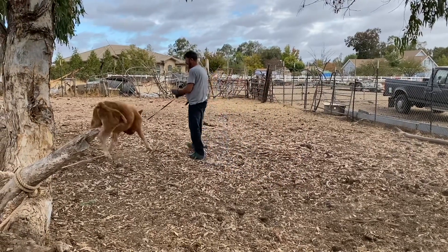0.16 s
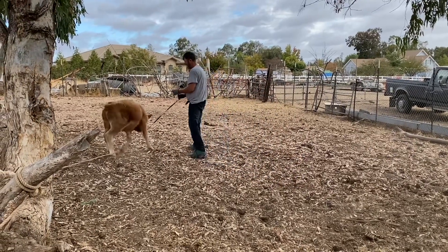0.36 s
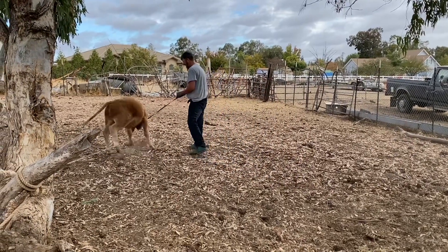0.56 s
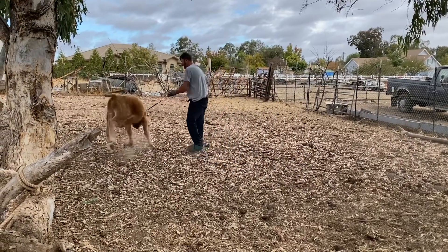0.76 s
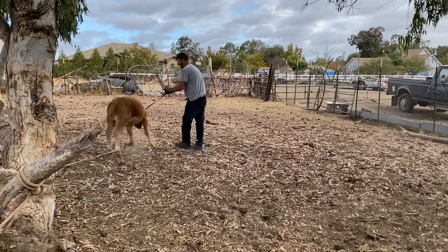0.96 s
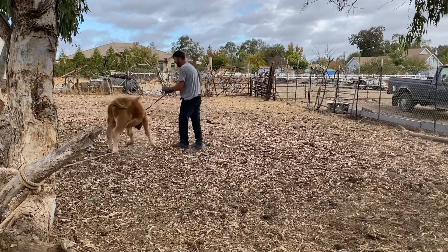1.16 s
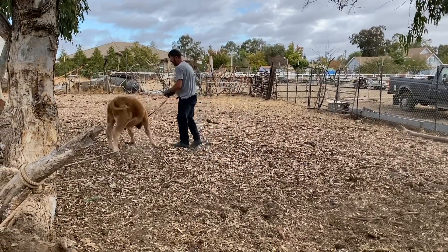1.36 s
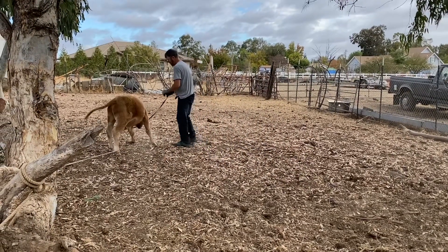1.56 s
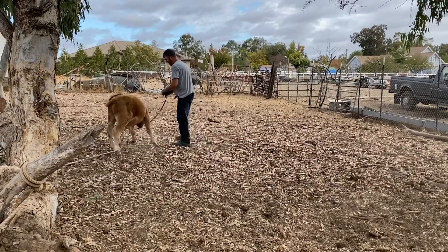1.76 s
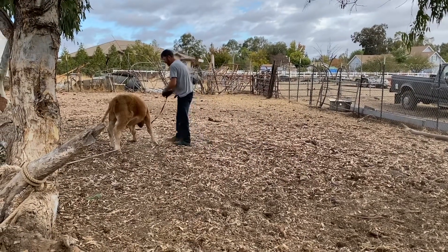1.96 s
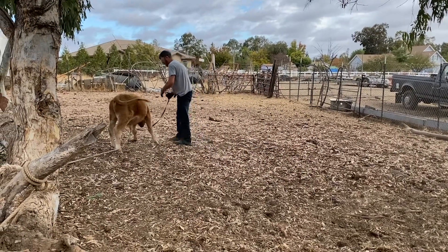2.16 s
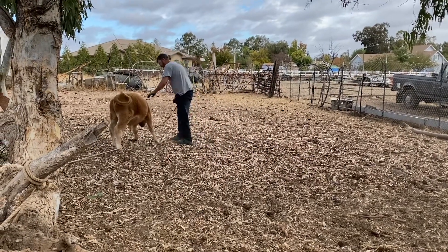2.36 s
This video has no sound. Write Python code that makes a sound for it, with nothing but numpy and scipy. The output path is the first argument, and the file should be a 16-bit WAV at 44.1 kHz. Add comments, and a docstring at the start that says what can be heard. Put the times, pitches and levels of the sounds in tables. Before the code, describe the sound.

Outdoors in a dirt pen, a hoof cracks dry chips, then a calf slightly left of centre bawls once, raspy then blaring and slowly falling, over brief litter scuffing and low rumble, with a faint scattered outdoor echo.

```python
"""A low outdoor rumble, then a hoof snaps dry wood chips and a calf on a rope bawls once in a dirt pen.
The voice starts as a rattle, climbs in strained steps, holds a clear note that slowly sinks, and drops
away as the mouth closes: pulses of the vocal folds ring a throat that glides between postures.
Hooves scuff the litter as grainy noise; fences and trees answer faintly as fading scattered noise."""
import sys
import numpy as np
from scipy import signal
from scipy.fft import rfft, irfft, next_fast_len
from scipy.io import wavfile
from scipy.ndimage import map_coordinates

SR = 44100
rng = np.random.default_rng(int(sys.argv[2]) if len(sys.argv) > 2 else 0)


def output_pcm(signal):
    """Save a mono or channel-first signal as 16-bit PCM at the path in sys.argv[1].

    Samples are clipped to [-1, 1] before scaling.
    """
    pcm = np.clip(np.atleast_2d(signal).T, -1, 1) * 32767
    wavfile.write(sys.argv[1], SR, np.round(pcm).astype(np.int16))


N = 105840  # 2.4 s


def amp(db):
    """Decibels to gain."""
    return 10 ** (np.asarray(db) / 20)


def unit(x):
    """Scaled to rms 1."""
    return x / np.sqrt(np.mean(x ** 2) + 1e-20)


def along(points, hz):
    """(Hz, value) points read on a log frequency axis."""
    point_hz, values = np.transpose(points)
    return np.interp(np.log(hz + 1), np.log(point_hz + 1), values)


def at(curve, t):
    """(s, value) points read at times t."""
    return np.interp(t, *np.transpose(curve))


def wobble(rate):
    """A smooth random curve, rate knots a second."""
    knots = rng.standard_normal(int(N * rate / SR) + 4)
    return map_coordinates(knots, [np.arange(N) * rate / SR])


def filtered(x, response):
    """x times a complex response of frequency."""
    padded = next_fast_len(N + SR // 2)
    hz = np.fft.rfftfreq(padded, 1 / SR)
    return irfft(rfft(x, padded) * response(hz), padded)[..., :N]


def noise(spectrum):
    """Two unrelated coloured noises of rms 1."""
    white = rng.standard_normal((2, N))
    return unit(filtered(white, lambda hz: amp(along(spectrum, hz))))


def air():
    """Outdoor rumble: coloured noise, nearly mono in the bass, widest near 400 Hz, gently swelling."""
    # background colour: freq_hz, level_db
    rumble = [(25, -29), (44, 0), (110, -3), (200, -9), (350, -22), (1500, -29), (3000, -39), (16000, -64)]
    # correlation of the two channels: freq_hz, likeness (0-1)
    likeness = [(100, 0.99), (400, 0.47), (1200, 1), (4000, 1)]
    level_db, swell_db = -48, 2

    def mid_and_side(hz):
        angle = np.arccos(np.clip(along(likeness, hz), -1, 1)) / 2
        return np.array([np.cos(angle), np.sin(angle)])

    mid, side = filtered(noise(rumble), mid_and_side)
    stereo = unit(np.array([mid + side, mid - side]))
    return stereo * amp(level_db + swell_db * wobble(7.2))


def snaps():
    """Dry chips crack under a hoof: bursts of bright noise with instant onset and exponential decay."""
    # cracks: start_s, level_db, t60_s
    cracks = [(.034, -35, .0067), (.039, -57, .071), (.094, -50, .035), (.355, -47, .025),
              (.998, -56, .098)]
    # colour of splitting wood: freq_hz, level_db
    wood = [(500, -24), (1500, -8), (4000, -17), (7000, -2), (16000, -15)]
    t = np.arange(N) / SR
    envelope = 0
    for start_s, level_db, t60_s in cracks:
        envelope = envelope + (t >= start_s) * amp(level_db - 60 * np.abs(t - start_s) / t60_s)
    return noise(wood)[0] * envelope


def causal(gain):
    """Rows of gains as minimum-phase spectra, which ring only after their excitation."""
    cepstrum = irfft(np.log(gain + 1e-9))
    half = cepstrum.shape[1] // 2
    cepstrum[:, 1:half] *= 2
    cepstrum[:, half + 1:] = 0
    return np.exp(rfft(cepstrum))


def bell(hz, centre_hz, width_hz):
    """Resonance curve, 1 at its centre and half at the edges of its width."""
    return 1 / (1 + (2 * (hz - centre_hz) / width_hz) ** 2)


def throat(times, hz):
    """Gain of throat and mouth at each time: resonances glide between postures, cavities cut hollows."""
    # resonances in each posture: centre_hz, width_hz (before the bell is sharpened), level_db
    rattle = [(318, 50, -24), (425, 56, -2.5), (1200, 530, -5), (1580, 113, -1), (2060, 330, -22),
              (3000, 500, -32)]
    strained = [(375, 80, -14), (488, 85, 0), (1200, 600, -9), (1640, 340, 0), (2230, 520, -17),
                (3000, 900, -39)]
    nasal = [(400, 130, -1), (545, 100, 0), (1300, 620, -7), (1720, 280, -7), (2330, 600, -17),
             (3600, 1100, -34)]
    parting = [(400, 130, -6), (550, 100, 2), (1130, 400, -8), (1650, 600, -10), (2270, 330, -9.5),
               (3300, 1500, -34)]
    wide_open = [(409, 170, -3.5), (529.7, 98, 4), (1152, 650, -4.5), (1628, 295, 0.5), (2242, 556, -6.5),
                 (3240, 1200, -33)]
    narrowed = [(429, 71, -8.5), (526, 165, 5), (1191, 253, -16), (1680, 500, -23), (2200, 720, -23),
                (3100, 500, -40)]
    closing = [(402, 89, -0.5), (534, 175, 6), (1182.8, 168, -8), (1435, 1500, -16.5), (2350, 464, -17),
               (3050, 800, -27)]
    # mouth movement: time_s, posture (0-6, in the order above; fractions blend neighbours)
    movement = [(.18, 0), (.245, 1), (.5, 1), (.63, 2), (.69, 2), (.79, 3), (.89, 4), (1.22, 4), (1.43, 5),
                (1.65, 5.1), (2.0, 6)]
    # faint top resonance: time_s, level_db
    sizzle = [(.3, -50), (1.2, -58.5), (1.8, -55), (2.2, -44)]
    # side cavities that swallow two bands: centre_hz, width_hz, depth_db
    cavities = [(860, 150, -5), (2870, 200, -5)]
    # sharp antiresonance that wanders as tongue and palate move: time_s, centre_hz, depth_db
    hollow = [(.6, 1560, 0), (.735, 1490, -18), (.78, 1400, -2), (1.08, 1290, 0), (1.17, 1260, -13),
              (1.26, 1240, -4), (1.38, 940, -9), (1.58, 915, -9), (1.7, 900, 0), (2.1, 860, -8),
              (2.2, 850, 0)]
    # lips shutting, with twice the cut from 2 kHz up: time_s, cut up to 1 kHz (dB)
    muffle = [(2.08, 0), (2.19, -12.5)]
    sizzle_hz, sizzle_width_hz = 6160, 1880
    hollow_width_hz = 110

    postures = np.array([rattle, strained, nasal, parting, wide_open, narrowed, closing])
    position = at(movement, times)
    weights = np.array([np.interp(position, np.arange(len(postures)), row) for row in np.eye(len(postures))])
    # blended to (column, resonance, time, 1)
    centre_hz, width_hz, level_db = np.einsum("pt,prc->crt", weights, postures)[..., None]
    power = (amp(level_db) ** 2 * bell(hz, centre_hz, width_hz) ** 2.62).sum(axis=0)
    sizzle_gain = amp(at(sizzle, times))[:, None] * bell(hz, sizzle_hz, sizzle_width_hz)
    power += sizzle_gain ** 2

    time_s, *columns = np.transpose(hollow)
    hollow_hz, depth_db = (np.interp(times, time_s, column)[:, None] for column in columns)
    cavities_db = sum(depth * bell(hz, centre, width) for centre, width, depth in cavities)
    hollow_db = depth_db * bell(hz, hollow_hz, hollow_width_hz)
    lips_db = at(muffle, times)[:, None] * np.clip(hz / 1000, 1, 2)
    return np.sqrt(power) * amp(cavities_db + hollow_db + lips_db)


def bawl(size=2048):
    """Every closing of the folds rings the throat; hoarseness scatters the pulses and adds rasp to each."""
    # vocal folds, before a slight random waver: time_s, pitch_hz
    pitch = [(.09, 91.16), (.2, 99.54), (.24, 105), (.26, 115.7), (.318, 115.5), (.342, 125.5), (.408, 127),
             (.44, 133.1), (.49, 127.4), (.53, 133.7), (.576, 130.3), (.62, 139.3), (.738, 135.4),
             (.764, 137.8), (.854, 137.4), (.906, 140.5), (.996, 142.5), (1.15, 140.6), (1.348, 137.2),
             (1.406, 133.5), (1.476, 133.9), (1.8, 128), (2.124, 123.4), (2.2, 114.1), (2.27, 90.2),
             (2.31, 83.6)]
    # hoarseness: time_s, roughness (0-1)
    roughness = [(.2, .88), (.26, .34), (.4, .2), (.58, .17), (.64, .07), (2.1, .05), (2.3, .4)]
    # chest tone, the lowest partials: time_s, level_db
    chest_level = [(.09, -50), (.14, -43), (.24, -45), (.45, -39.5), (.652, -39), (.799, -41), (2.24, -42),
                   (2.31, -55)]
    # lowest throat resonances, below the split: time_s, level_db
    low_level = [(.09, -50), (.14, -42), (.235, -42), (.262, -27), (.292, -25.5), (.325, -35), (.355, -27),
                 (.415, -30), (.45, -25.5), (.55, -26.5), (.81, -24), (.91, -26), (1.12, -24.5),
                 (1.4, -20.5), (1.59, -25.5), (2.0, -28.5), (2.222, -27), (2.25, -39), (2.3, -53)]
    # bright blare, above the split: time_s, level_db
    blare_level = [(.09, -60), (.143, -41), (.222, -37), (.256, -24.5), (.285, -28), (.347, -20.5),
                   (.41, -23.5), (.434, -18), (.462, -24), (.518, -24), (.553, -27.5), (.715, -29.5),
                   (.85, -23.5), (.981, -21), (1.349, -25.5), (1.56, -28), (1.671, -27), (2.198, -34),
                   (2.251, -52), (2.31, -66)]
    # the throat delays these bands and blunts each pulse: centre_hz, width_hz
    smears = [(490, 310), (1900, 1800)]
    chest_hz, split_hz = 297, 800
    jitter_s, shimmer_db = .0003, 4  # both scaled by roughness
    rasp_share, rasp_t60_s = 1.65, .018
    rasp_from_hz = 600  # the low partials stay clean
    rasp_doubles_hz = 3350  # above this the voice turns to hiss

    # one pulse for each full cycle of the folds
    t, hz = np.arange(N) / SR, np.fft.rfftfreq(size, 1 / SR)
    cycles = np.cumsum(at(pitch, t) * (1 + 0.0019 * wobble(29.74))) / SR
    times = np.interp(np.arange(1, int(cycles[-1])), cycles, t)
    times = times[(times > pitch[0][0]) & (times < pitch[-1][0])]
    chance = rng.standard_normal((len(times), size + 2))
    rough = at(roughness, times)
    times = times + jitter_s * rough * chance[:, 0]

    # each band is levelled by its power at the pulse rate
    gain = throat(times, hz)
    below_split = 1 / (1 + (hz / split_hz) ** 10)
    chest = (1 / (1 + (hz / chest_hz) ** 10) / (1 + (90 / (hz + 10)) ** 3))[None]
    bands = ((chest, chest_level), (gain * below_split, low_level), (gain * (1 - below_split), blare_level))
    shaped = 0
    for band, level in bands:
        power = np.mean(band ** 2, axis=1) * at(pitch, times) / SR
        shaped = shaped + band * (amp(at(level, times)) / np.sqrt(power))[:, None]

    # a decaying puff of noise joins each click, without raising its expected power
    puff = amp(-60 * t[:size] / rasp_t60_s)
    puff_spectrum = rfft(chance[:, 2:] * puff / np.linalg.norm(puff))
    rasp_colour = (1 + (hz / rasp_doubles_hz) ** 4) * hz ** 2 / (hz ** 2 + rasp_from_hz ** 2)
    rasp = rasp_share * rough[:, None] * rasp_colour
    source = (1 + rasp * puff_spectrum) / np.sqrt(1 + rasp ** 2)

    phase = sum(np.arctan2(hz * width, centre ** 2 - hz ** 2) for centre, width in smears)
    smear = np.exp(-2j * phase)
    start, fraction = np.divmod(times * SR, 1)
    subsample_shift = np.exp(-2j * np.pi * hz * fraction[:, None] / SR)
    pulses = irfft(causal(shaped) * smear * source * subsample_shift)
    pulses *= amp(shimmer_db * rough * chance[:, 1])[:, None]
    places = start.astype(int)[:, None] + np.arange(size)
    return np.bincount(places.ravel(), pulses.ravel(), N)[:N]


def scuff(grain_db=2, sway_db=.8):
    """Hooves plough the loose litter: hiss with fast random grain and a slower sway in level."""
    # drag of the hooves, before grain and sway: time_s, level_db
    drag = [(.2, -65), (.42, -59), (.46, -48), (.54, -47.5), (.63, -53), (1.2, -65), (2.24, -71),
            (2.4, -90)]
    # colour of the loose litter: freq_hz, level_db
    litter = [(500, -12.5), (2000, 8.5), (7000, -2.5), (11000, -0.5), (16000, -11.5)]
    level_db = at(drag, np.arange(N) / SR) + grain_db * wobble(500) + sway_db * wobble(25)
    return noise(litter) * amp(level_db)


def pen(x, t60, level):
    """Scattered answer of the surroundings: a noise tail whose frequencies each die at their own speed."""
    hz, t, grains = signal.stft(rng.standard_normal((2, SR // 2)), SR, nperseg=256)
    fade = amp(-60 * t / along(t60, hz)[:, None])
    fade = fade / np.linalg.norm(fade, axis=1, keepdims=True)
    tail = signal.istft(grains * fade, SR, nperseg=256)[1]
    wet = signal.fftconvolve(x[None], tail / np.linalg.norm(tail[0]), axes=1)[:, :N]
    return filtered(wet, lambda hz: amp(along(level, hz)))


def from_left(x):
    """The calf stands left of centre: that side leads, with a level difference that varies by band."""
    # lead of the left channel: freq_hz, lead_s
    lead = [(100, .00003), (550, .0002), (1000, .00012), (2750, .000125), (3100, 0)]
    # left level over right: freq_hz, difference_db
    louder = [(60, 0), (250, -3), (420, .5), (1150, 4.5), (1700, -1.5), (2400, -1), (2900, 4), (15000, -3)]
    sides = np.array([[.5], [-.5]])  # each side takes half the difference

    def placement(hz):
        shift = np.exp(2j * np.pi * hz * sides * along(lead, hz))
        return amp(sides * along(louder, hz)) * shift

    return filtered(x, placement)


def scene():
    """Rough ground and a nearby trunk scatter the calf's sound briefly; fences and trees answer longer."""
    # decay of the ground and trunk scatter: freq_hz, t60_s
    near_t60 = [(200, 0.021), (10000, 0.058)]
    # level of that scatter: freq_hz, level_db
    near_level = [(300, -31), (1300, -5.5), (2500, -5.5), (3600, 1)]
    # decay of the fences and trees: freq_hz, t60_s
    far_t60 = [(500, .36), (3000, .47), (12000, .21)]
    # level of their answer: freq_hz, level_db
    far_level = [(100, -24.5), (1200, -11), (3000, -4.5), (10000, -6)]
    calf = bawl() + snaps()
    near = pen(calf, near_t60, near_level)
    far = pen(calf, far_t60, far_level)
    return from_left(calf) + near + far + scuff() + air()


def record(dry):
    """The recorder keeps nothing above its band limit."""
    top_hz = 15900
    return filtered(dry, lambda hz: hz < top_hz)


dry = scene()
out = record(dry)
output_pcm(out)
```